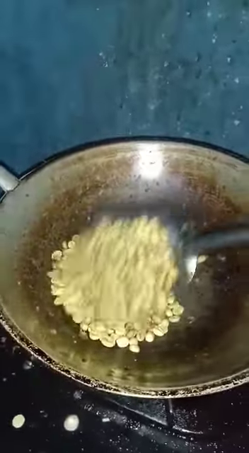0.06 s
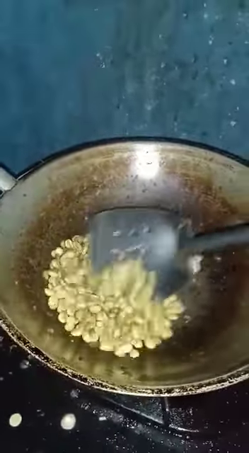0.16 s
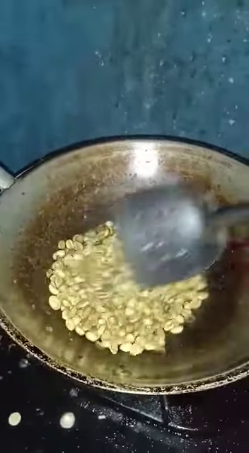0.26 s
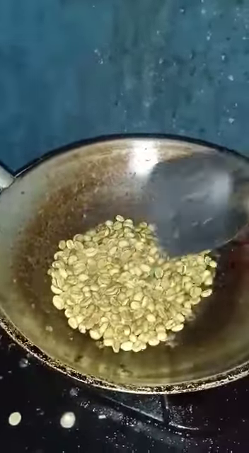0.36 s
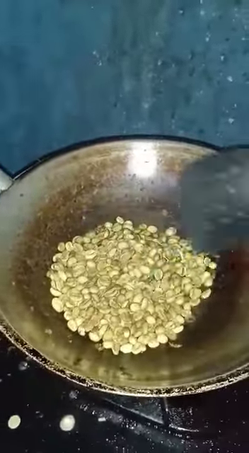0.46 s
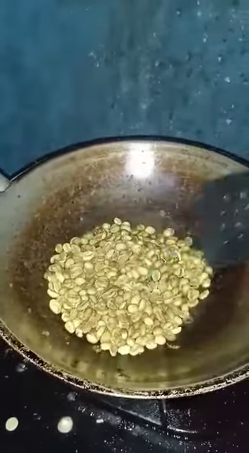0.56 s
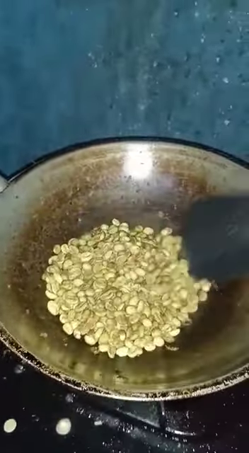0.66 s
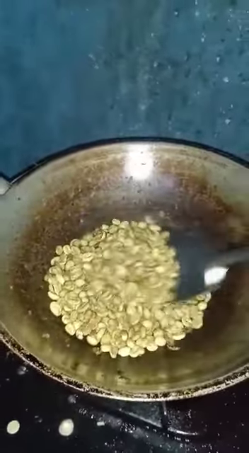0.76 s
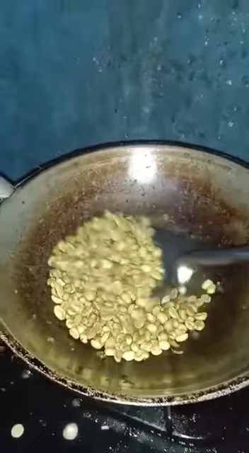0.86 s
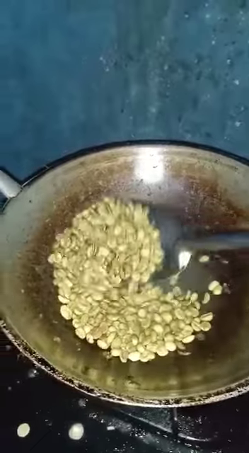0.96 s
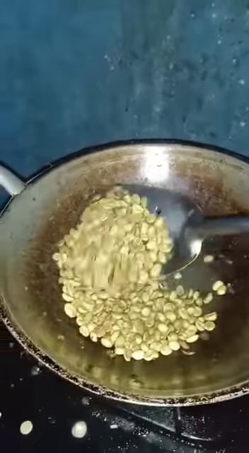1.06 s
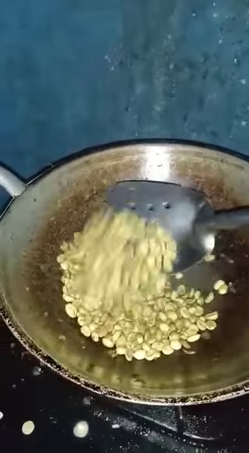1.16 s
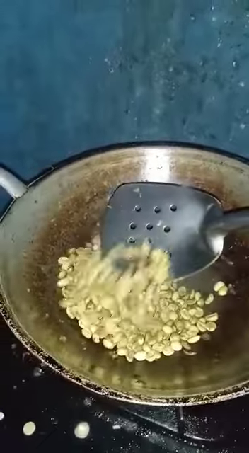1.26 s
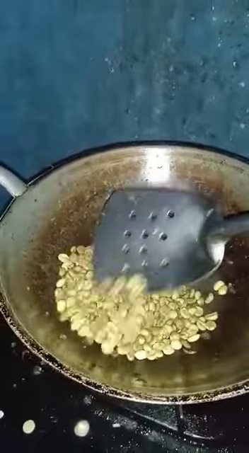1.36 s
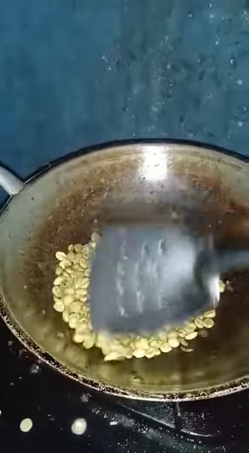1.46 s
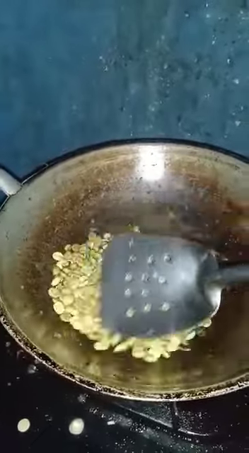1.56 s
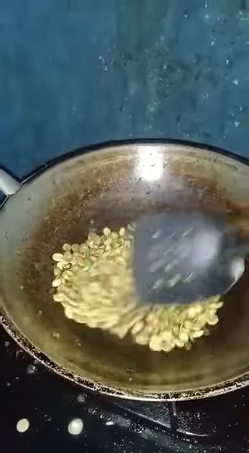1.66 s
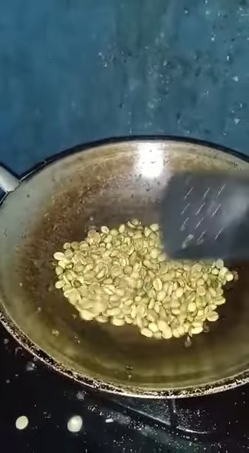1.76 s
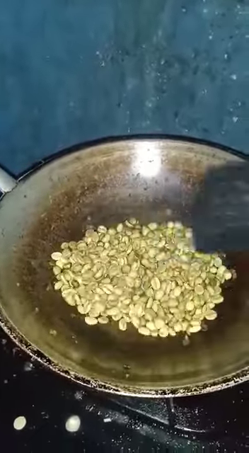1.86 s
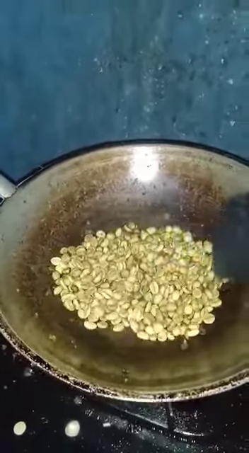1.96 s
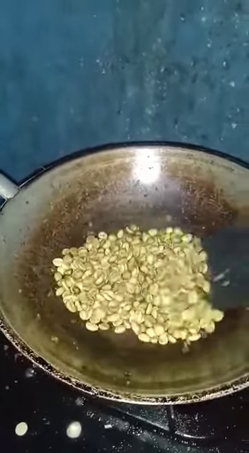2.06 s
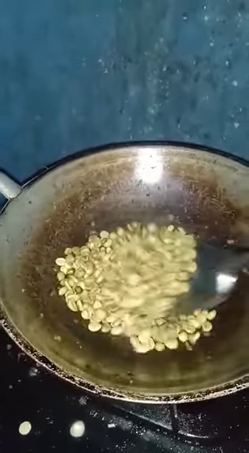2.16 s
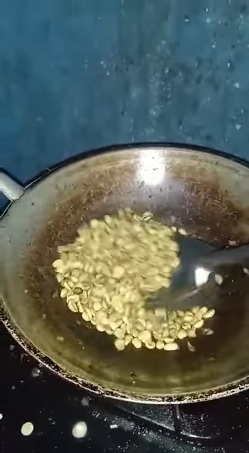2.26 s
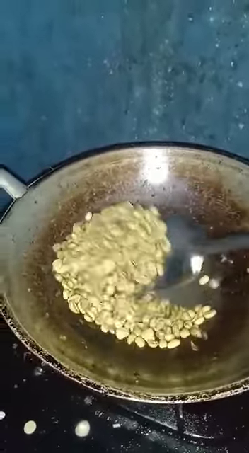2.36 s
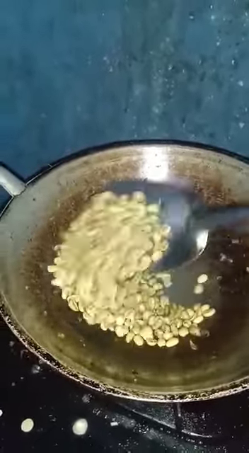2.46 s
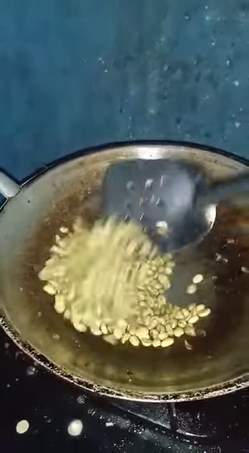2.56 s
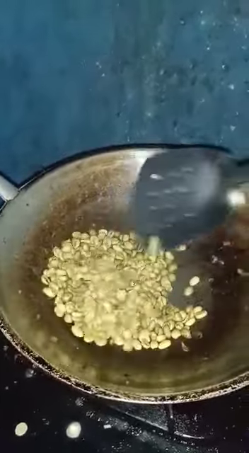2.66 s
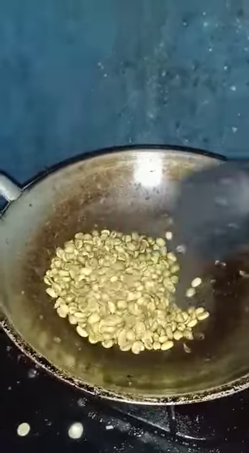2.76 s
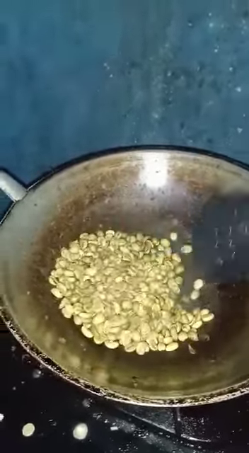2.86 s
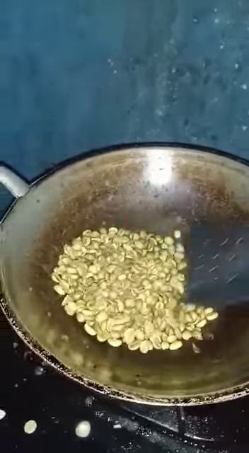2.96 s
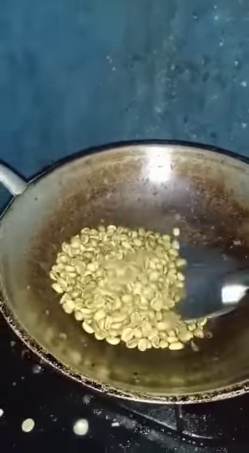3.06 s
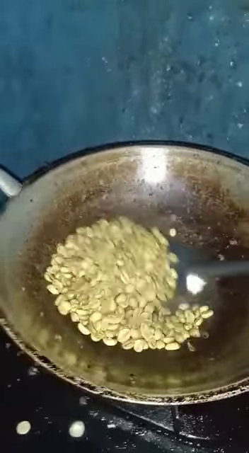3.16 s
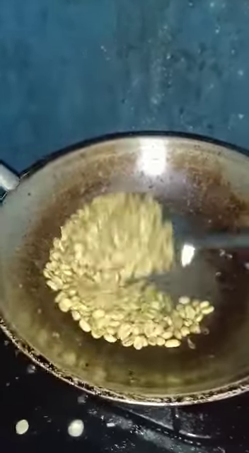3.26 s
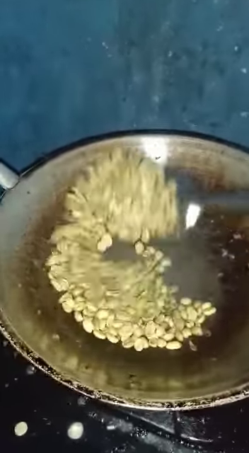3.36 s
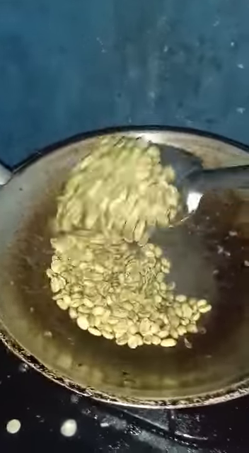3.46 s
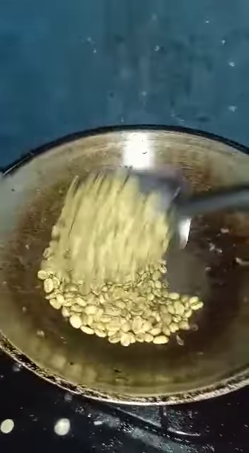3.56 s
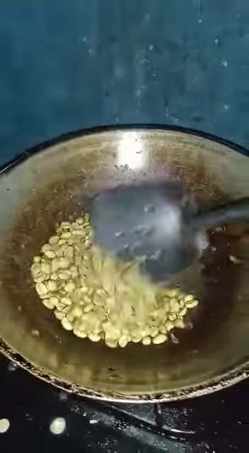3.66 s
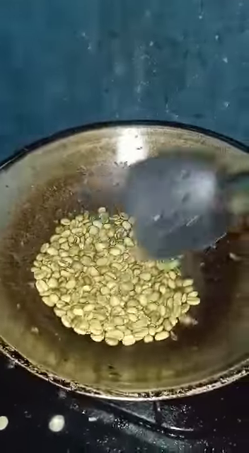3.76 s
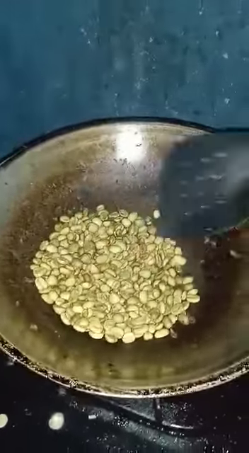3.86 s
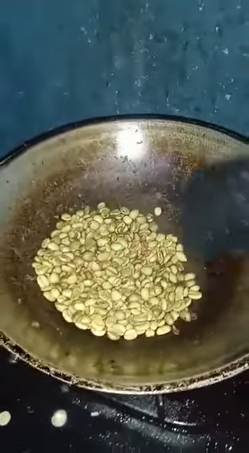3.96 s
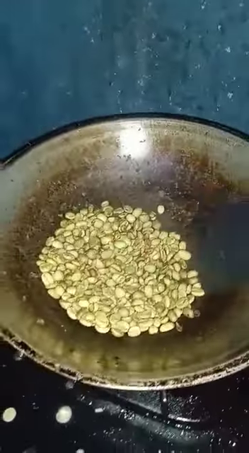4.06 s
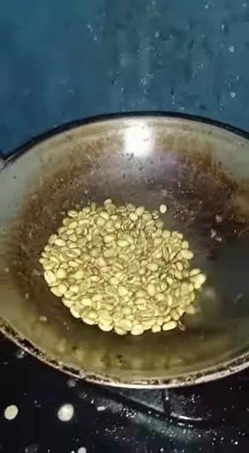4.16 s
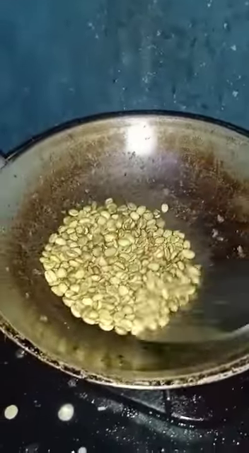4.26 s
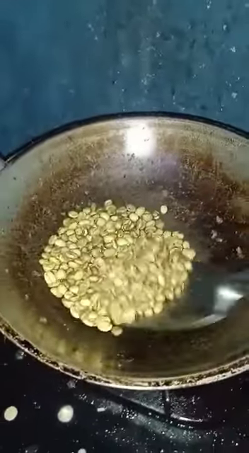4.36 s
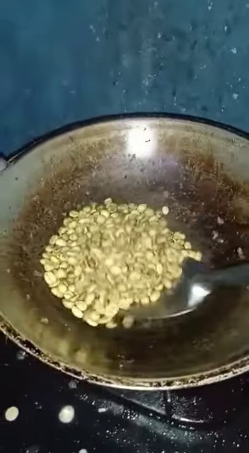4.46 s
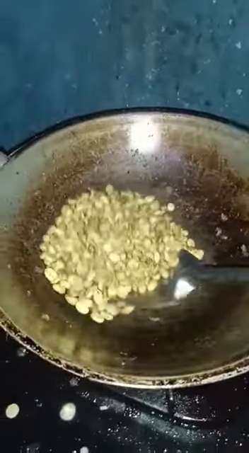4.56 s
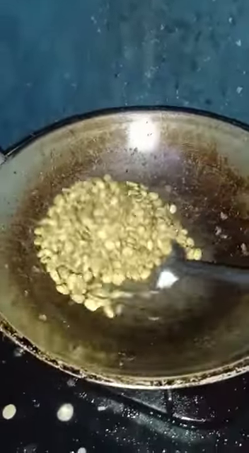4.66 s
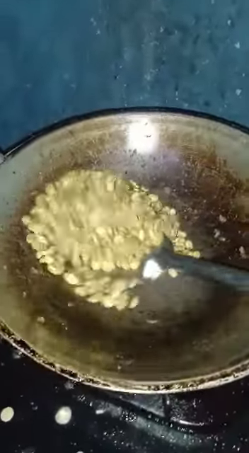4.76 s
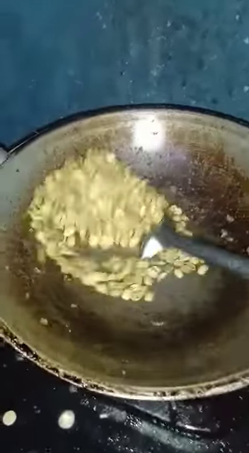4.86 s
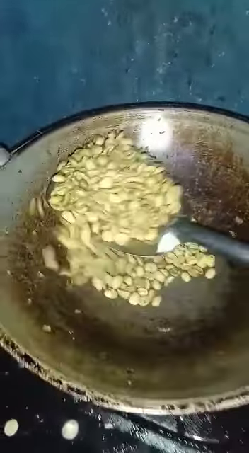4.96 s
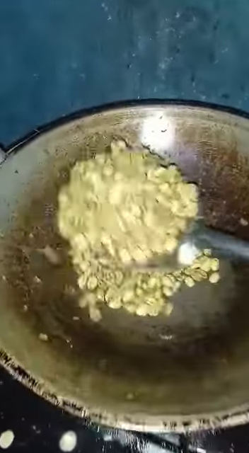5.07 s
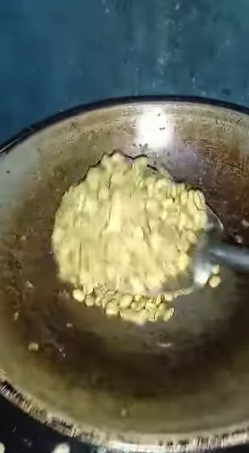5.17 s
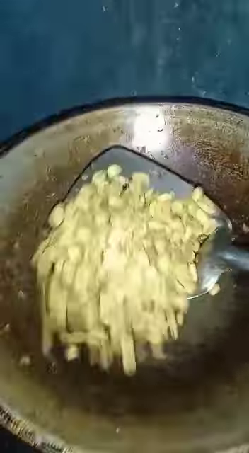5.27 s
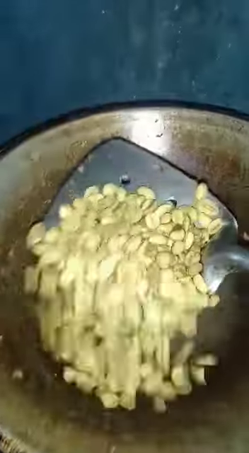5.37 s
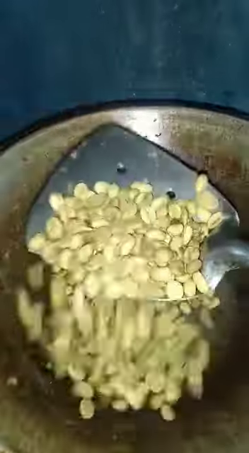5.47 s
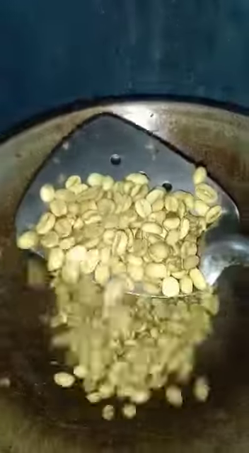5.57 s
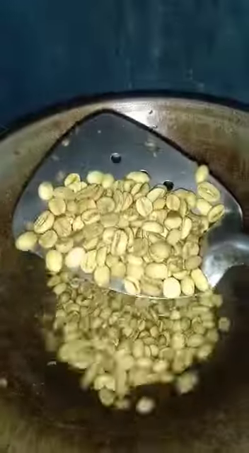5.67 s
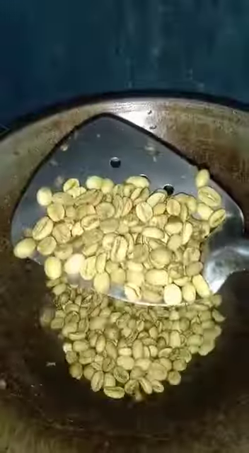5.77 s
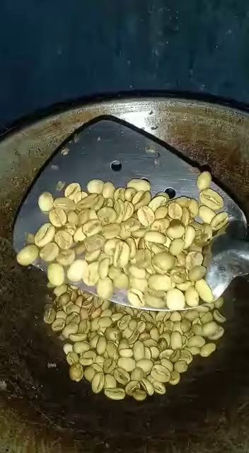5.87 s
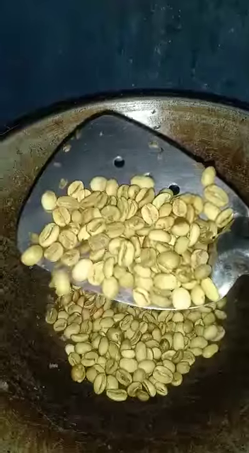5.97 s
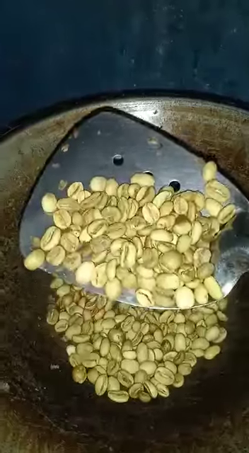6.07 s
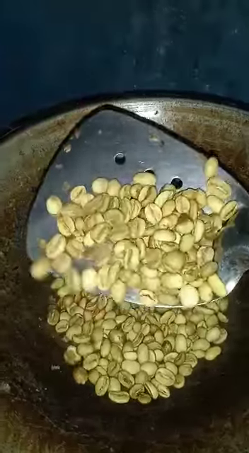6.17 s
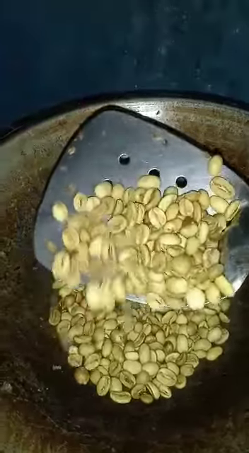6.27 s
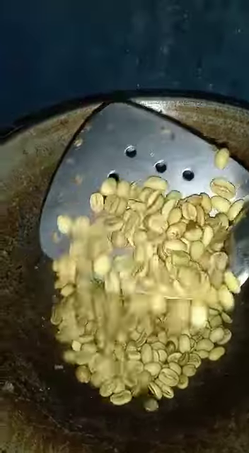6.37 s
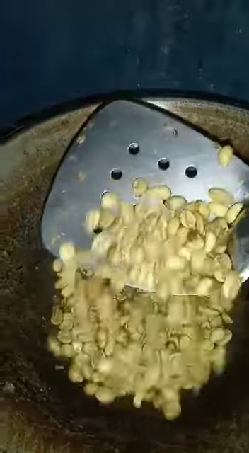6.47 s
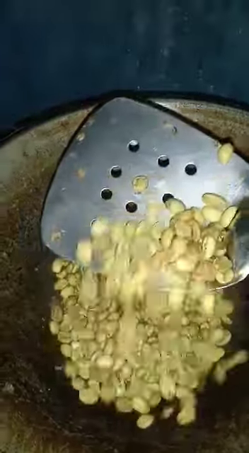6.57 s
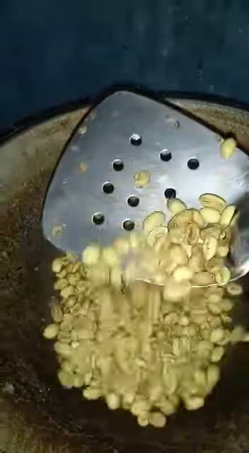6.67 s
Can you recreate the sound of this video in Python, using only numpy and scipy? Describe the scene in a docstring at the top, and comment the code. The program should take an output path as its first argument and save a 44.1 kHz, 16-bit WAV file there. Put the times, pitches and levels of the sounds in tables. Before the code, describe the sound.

A metal spatula scoops and pours dry beans in a steel wok, rattling and scraping, with a few ringing knocks over a faint flame hiss.

```python
"""Close to a phone in a small kitchen, a steel spatula scoops and pours dry beans in a wok.
Throughout, filtered noise is the soft flame hiss, a sine the high whine, ringing boards the dull footfalls.
A thin squeal glides past early on, among short slides of dense random clicks, scrapes and light knocks.
Harder blows then ring the wok's decaying modes; bowed tones and rough groans come and go under the blade.
Towards the end beans land hard and pour loudest, as filtered bursts and crackles in a short room tail."""
import sys
import numpy as np
from scipy import signal
from scipy.fft import rfft, irfft
from scipy.io import wavfile
from scipy.ndimage import uniform_filter1d

SR = 44100
rng = np.random.default_rng(int(sys.argv[2]) if len(sys.argv) > 2 else 0)


def digitize_waveform(pressure):
    """Quantize a signal to 16-bit integers and store it at the path in sys.argv[1].

    Rows of a 2-D input are taken as channels; values are limited to [-1, 1].
    """
    field = np.atleast_2d(pressure).T
    bounded = np.clip(field, -1, 1)
    quanta = np.round(bounded * 32767).astype(np.int16)
    wavfile.write(sys.argv[1], SR, quanta)


N = 295911
TIME = np.arange(N) / SR

# ringing modes of the wok, before damping: f/Hz, level/dB, t60/s
WOK_MODES = [(315, -6, .2), (343, -2, .25), (366, -4, .2), (483, 0, .3), (861, -6, .2), (1200, -12, .22),
             (1739, -7, .24), (1971, -2, .3), (1992, -4, .25), (2103, 0, .3), (2300, -9, .2),
             (2435, -5, .26), (2564, -6, .3), (2885, -5, .15), (3177, -4, .2), (3391, -12, .25),
             (3973, -12, .25), (4479, -11, .22), (4732, -8, .16), (5082, -7, .12), (5491, -11, .18),
             (6169, -6, .15), (6385, -9, .2), (7671, -10, .1)]
# spectrum of bean clicks: f/Hz, level/dB
BEAN_SPECTRUM = [(2000, -83.5), (3400, -21.5), (4170, -13), (4540, -3), (4770, 4), (5630, 7.5), (6770, 6),
                 (9000, -37), (11700, -79.5), (19800, -120)]
# spectrum of the sharp edge of the clicks: f/Hz, level/dB
EDGE_SPECTRUM = [(5000, -25.5), (8500, -4), (13500, -16.5), (15400, -4), (16200, -19), (16400, -13.5),
                 (16500, -72)]


def undb(db):
    """Amplitude factor of a level in dB."""
    return 10 ** (np.asarray(db) / 20)


def unit(x):
    """Scale to an RMS of 1."""
    return x / np.sqrt(np.mean(x ** 2))


def colour(x, table):
    """Causal minimum-phase filter with the gain of a (f/Hz, level/dB) table."""
    hz, db = np.transpose(table)
    grid = np.maximum(np.fft.rfftfreq(2048, 1 / SR), 1)
    gain_db = np.interp(np.log(grid), np.log(hz), db)
    # fold the cepstrum onto positive time
    cepstrum = irfft(np.log(undb(gain_db)))
    cepstrum[1:1024] *= 2
    cepstrum[1025:] = 0
    response = irfft(np.exp(rfft(cepstrum)))
    return signal.fftconvolve(x, response)[:len(x)]


def band(x, hz, width):
    """Steep resonance: a band-pass applied twice."""
    b, a = signal.iirpeak(hz, hz / width, SR)
    return signal.lfilter(b, a, signal.lfilter(b, a, x))


def ring(x, hz, t60):
    """One decaying mode; a unit impulse gives a sine that starts to decay from 1."""
    pole = np.exp(2j * np.pi * hz / SR - np.log(1000) / (t60 * SR))
    return signal.lfilter([1], [1, -pole], x).imag


def glide(hz):
    """Sine of RMS 1 that follows a frequency in Hz, sample by sample."""
    return np.sqrt(2) * np.sin(2 * np.pi * np.cumsum(hz) / SR)


def walk(rate):
    """Random levels held 1 / rate s and slewed twice; RMS 1."""
    k = int(SR / rate)
    held = np.repeat(rng.standard_normal(N // k + 1), k)
    return unit(uniform_filter1d(uniform_filter1d(held, k), k)[:N])


def drive(force, modes, wander_db, damp=0.52):
    """A steady force rings each mode near its table level; the contact wanders, so the modes take turns."""
    out = 0
    for hz, db, t60 in modes:
        push = force * undb(db + wander_db * walk(5.6))
        out = out + ring(push, hz, damp * t60) / np.sqrt(t60 * SR / 24)
    return out


def clicks(rate, spread_db, clump_db, clump_rate, t60):
    """Random impacts in clumps, a few much harder than the rest; each is a short dying crackle."""
    chance = rng.random((2, N))
    size = undb(-spread_db * np.log(chance[1] + 0.04) + clump_db * walk(clump_rate))
    impacts = (chance[0] < rate / SR) * size ** 2
    fade = np.exp(-2 * np.log(1000) / (t60 * SR))
    power = signal.lfilter([1], [1, -fade], impacts)
    return unit(np.sqrt(power) * rng.standard_normal(N))


def burst(length_s, t60):
    """Noise that dies away, peak near 1."""
    t = np.arange(int(length_s * SR)) / SR
    return rng.standard_normal(len(t)) * undb(-60 * t / t60) / 2


def add(out, s, x):
    """Mix x into out from s seconds on."""
    i = int(s * SR)
    out[i:i + len(x)] += x[:max(len(out) - i, 0)]


def swells(s, length_s, first_db, last_db, rise_s, fall_db_s):
    """Level in dB of overlapping gestures: quick rise, straight ramp, steady fall."""
    power = 1e-16
    for t, n, a, b in zip(s, length_s, first_db, last_db):
        end = t + max(n, rise_s)
        corners_s = [t, t + rise_s, end, end + 80 / fall_db_s]
        level_db = np.interp(TIME, corners_s, [a - 30, a, b, b - 80], -200, -200)
        power = power + undb(2 * level_db)
    return 10 * np.log10(power)


def flame():
    """Filtered noise: a soft hiss that flutters a little."""
    # spectrum of the burning gas: f/Hz, level/dB
    flame_spectrum = [(18, -53.5), (30, -20.5), (192, 0.5), (270, -5), (369, 1), (622, -19.5),
                      (1140, -16.5), (1360, -3.5), (1640, -15), (2550, -11.5), (3490, -16), (6370, -19.5),
                      (8280, -27), (12900, -42), (15500, -13.5)]
    hiss = unit(colour(rng.standard_normal(N), flame_spectrum))
    return undb(-68 + 1.9 * walk(6.)) * hiss


def whine():
    """A steady high sine whose level wavers around a slow curve."""
    # mean level of the whine: t/s, level/dB
    whine_curve = [(0.0, -87), (1.9, -85), (5.3, -76.5), (5.8, -81), (6.71, -77)]
    s, db = np.transpose(whine_curve)
    level_db = np.interp(TIME, s, db) + walk(5.9)
    return undb(level_db) * np.sqrt(2) * np.sin(2 * np.pi * 15626 * TIME)


def squeal():
    """One thin sine that glides up and back."""
    # path of the squeal: t/s, f/Hz, level/dB
    squeal_path = [(0.3, 11800, -102), (0.382, 13087, -91), (0.472, 14030, -94), (0.5, 14240, -102),
                   (0.506, 12998, -93), (0.53, 12170, -97)]
    s, hz, db = np.transpose(squeal_path)
    level_db = np.interp(TIME, s, db, -140, -140)
    return undb(level_db) * glide(np.interp(TIME, s, hz))


def steps():
    """Heel and sole: two dull thumps that shake the floor boards into decaying modes."""
    # footfalls: t/s, heel peak level/dB
    step_times = [(0.076, -52), (0.272, -44), (0.612, -41), (0.913, -49.5), (1.304, -48), (1.688, -46),
                  (2.02, -47), (2.303, -47.5), (2.736, -44), (3.101, -45.5), (3.452, -51), (3.757, -45.5),
                  (4.132, -61), (4.491, -49), (4.819, -48), (5.179, -47.5), (5.559, -49.5), (5.75, -48.5),
                  (5.929, -49), (6.3, -50), (6.671, -49)]
    # boards under the feet: f/Hz, level/dB (before a weight by f), t60/s
    floor_modes = [(95, -7, 0.17), (130, 2.5, 0.081), (216, 5, 0.091), (313, 12, 0.038), (341, -6.5, 0.14)]
    sole_delay_s, sole_db = 0.0159, -4
    out = np.zeros(N)
    for s, db in step_times:
        for delay_s, part_db in ((0, 0), (sole_delay_s, sole_db)):
            push = uniform_filter1d(burst(.2, 0.031), size=30)  # softened contact
            thump = sum(undb(g) * ring(push, hz, t60) * hz for hz, g, t60 in floor_modes)
            add(out, s + delay_s, undb(db + part_db) * thump / np.abs(thump).max())
    return out


def groans():
    """The blade groans as it slides under the heap: a rough gliding tone that swells and fades."""
    # groans: start t/s, end t/s, start f/Hz, end f/Hz, RMS level before the swell/dB
    groan_table = [(0.602, 0.767, 496.5, 700, -60), (2.023, 2.186, 520, 652, -63),
                   (2.88, 3.106, 530, 619, -59), (4.257, 4.463, 552, 519, -65)]
    out = np.zeros(N)
    for start, end, from_hz, to_hz, db in groan_table:
        u = np.linspace(0, 1, int((end - start) * SR))
        rough = uniform_filter1d(rng.standard_normal((2, len(u))), size=500)
        phase = 2 * np.pi * np.cumsum(from_hz + (to_hz - from_hz) * u) / SR
        tone = (rough[0] + 1j * rough[1]) * np.exp(1j * phase)
        add(out, start, undb(db) * unit(tone.real) * np.sin(np.pi * u))
    return out


def bows():
    """The dragging blade bows one wok mode: a slightly unsteady tone, quick to start, then ringing out."""
    # catches of the blade: start t/s, length/s, mean f/Hz, level before flutter/dB
    bow_table = [(0.123, 0.046, 2280, -60), (0.15, 0.13, 481.7, -64), (0.511, 0.085, 484, -60.5),
                 (0.648, 0.023, 494, -54), (0.653, 0.083, 2877, -60), (1.973, .07, 1966, -61),
                 (2.503, 0.11, 2310, -64), (2.861, 0.11, 488, -62), (2.851, 0.058, 870, -60.5),
                 (3.007, 0.051, 3190, -49.5), (3.403, 0.14, 1952, -57.5), (3.527, 0.24, 482, -66.5),
                 (3.625, 0.065, 2290, -60.5), (4.61, .09, 2280, -70.5), (4.878, 0.24, 2915, -59.5),
                 (4.906, 0.19, 2087, -59.5), (4.947, 0.21, 483, -68.5)]
    rise_s, fall_db_s = .015, 300.
    flutter_db, jitter = 3., .006  # jitter as a share of the pitch
    out = 0
    for s, length_s, hz, db in bow_table:
        level_db = swells([s], [length_s], [db], [db], rise_s, fall_db_s) + flutter_db * walk(40.)
        out = out + undb(level_db) * glide(hz * (1 + jitter * walk(60.)))
    return out


def scrape(grit_db):
    """The blade stutters over steel; the slips grate, and the drag bows the low and the middle wok modes."""
    grit_hz = 3186 * (1 + 0.12 * walk(2.78))  # the centre of the grit drifts
    slips = clicks(rate=1100.0, spread_db=4.0, clump_db=3.5, clump_rate=30., t60=0.012)
    # beans skidding on bare steel
    grit = undb(6.5 + 2 * walk(11.0)) * unit(band(slips, 4203.0, 660.0))
    # fixed bands fade in and out as the drifting centre passes them
    for hz in np.geomspace(2200, 3600, num=6):
        nearness = np.exp(-.5 * (np.log2(grit_hz / hz) / .25) ** 2)
        grit = grit + nearness * unit(band(slips, hz, 450.))
    # the wok rings under any slide
    bow = rng.standard_normal(N)
    hum_db, sing_db = grit_db - 17, grit_db - 20
    hum = drive(bow * undb(hum_db), WOK_MODES[3:4], wander_db=0.7, damp=0.93)
    hum = hum + drive(bow * undb(hum_db - 3), WOK_MODES[:3], wander_db=5.0)
    sing = drive(bow * undb(sing_db), [WOK_MODES[7], WOK_MODES[9]], wander_db=1.5, damp=0.4)
    upper = drive(bow * undb(grit_db - 9), WOK_MODES[10:], wander_db=4.0, damp=.5)
    return undb(grit_db + 1.5) * grit + hum + sing + upper


def knocks():
    """Each blade blow rings the wok modes with its own weights, over a clash of unresolved ones."""
    # blows: t/s, level/dB, bass share/dB, treble share/dB (shares before limits),
    # damping by the beans/0-1, level of the ringing modes/dB
    knock_table = [(0.524, -58, 10, 17, 0.1, -11), (0.609, -45, -9, 22, 0.2, -15),
                   (1.532, -36, 6, 11, 0.91, -11), (1.981, -39, 0, 23, 0.15, -15),
                   (2.86, -39.5, -0.5, 10, 0.7, -15.5), (3.645, -30.5, -4.5, -1, 0.9, -26),
                   (3.898, -55.5, -12, 2, 0, -26), (4.118, -22.5, -2, -1.5, 0.41, -9),
                   (4.704, -37, 10, -16, 1, -7)]
    tilt_hz = [500, 800, 1000, 1700, 3200, 4500]
    out = np.zeros(N)
    for s, db, bass_db, treble_db, damp, ring_db in knock_table:
        bass_db, treble_db = np.clip([bass_db, treble_db], -14, 10)
        blow = np.diff(burst(.6, 0.023))  # a shell radiates the change of force, so little below its modes
        weight_db = 1.5 * rng.standard_normal(len(WOK_MODES))
        low_db = bass_db - 14 * damp ** 3  # a heap of beans stills the lowest modes most
        ringing = 0
        for (hz, mode_db, t60), w in zip(WOK_MODES, weight_db):
            tilt_db = np.interp(np.log(hz), np.log(tilt_hz), [low_db, bass_db, bass_db, 0, 0, treble_db])
            mode = ring(blow, hz, t60 * np.clip(1.3 - damp, .1, 1.2))
            ringing = ringing + undb(mode_db + w + tilt_db) * mode / np.abs(mode).max()
        body = [(60, low_db - 29), (280, low_db - 19), (900, bass_db), (1500, -6), (3200, 1),
                (6300, treble_db + 1.0), (8500, treble_db - 15), (13000, treble_db - 25),
                (16000, treble_db - 9.5)]
        clash = colour(burst(.6, 0.36 - 0.23 * damp), body)[1:]
        add(out, s, undb(db) * (undb(ring_db) * ringing + undb(5.5) * clash))
    return out


def drops():
    """A single bean landing hard: click, short chatter, hollow knock, from one dying burst of noise."""
    # landings: t/s, click peak level/dB
    drop_table = [(0.0823, -34), (0.1078, -36), (0.5264, -37), (0.609, -45), (0.9387, -34), (1.4017, -30),
                  (1.508, -39), (1.9884, -28), (2.0417, -37), (2.0875, -33), (2.2746, -31), (2.4714, -44),
                  (2.8609, -30.5), (3.327, -34), (3.5528, -22), (3.9012, -41), (4.117, -25.5),
                  (4.2554, -37), (4.5587, -39), (4.6002, -40), (4.9242, -26), (5.1043, -19), (5.2115, -30),
                  (5.2787, -18.5), (5.298, -36), (5.3493, -14.5), (5.5117, -22.5), (5.693, -20.5),
                  (5.7253, -25), (6.1026, -29), (6.294, -48.5), (6.3102, -25), (6.3595, -25), (6.3924, -32),
                  (6.4196, -24.5), (6.4545, -17.5), (6.5139, -17.5), (6.5794, -21)]
    click_rise_s = .002  # from first touch to the peak of a click
    out = np.zeros(N)
    for s, db in drop_table:
        knock_db = -29.5 + 2.5 * rng.standard_normal()
        hit = burst(.06, 0.047)
        click = colour(hit, BEAN_SPECTRUM) + undb(-10.5) * colour(hit, EDGE_SPECTRUM)
        touch = hit * undb(-60 * np.arange(len(hit)) / SR / 0.0015)
        knock = ring(touch, 893.0, 0.035)
        landing = click / np.abs(click).max() + undb(knock_db) * knock / np.abs(knock).max()
        add(out, s - click_rise_s, undb(db) * landing)
    return out


def beans(rattle_db, heap_db):
    """Dense clicks of three crowds of beans, a little apart in pitch; they drum the bowl's air, wok and blade."""
    # air in the bowl: f/Hz, width/Hz, mean level/dB
    bowl_air = [(605, 350, -9.5), (640, 160, -12.5), (889, 340, 8), (1070, 600, -4.5)]
    # modes of the thin spatula, before damping: f/Hz, level/dB, t60/s
    blade_modes = [(8490, 0, .5), (9141, -2, .5), (10800, -5, .4), (11550, -3, .4)]
    # the louder the rattle, the larger the share of sharp edge; -19.5 dB at a rattle of -40 dB
    edge_db = -19.5 + .25 * np.maximum(rattle_db + 40, -20)
    clump = undb(1.5 * walk(35.))
    rattle, hits = 0, 0
    for shift in (.95, 1., 1.05):
        crowd = clump * clicks(rate=350., spread_db=4.0, clump_db=2.0, clump_rate=80., t60=0.014)
        spectrum = [(shift * hz, db) for hz, db in BEAN_SPECTRUM]
        rattle = rattle + undb(1.5 * walk(9.)) * unit(colour(crowd, spectrum))
        hits = hits + crowd
    bowl = sum(undb(db + 3.3 * walk(5.94)) * band(hits, hz, width) for hz, width, db in bowl_air)
    upper_modes = [m for m in WOK_MODES if m[0] > 2200]
    wok = drive(hits * undb(rattle_db - 40), upper_modes, wander_db=3.)
    blade = drive(hits * undb(rattle_db + edge_db - 26.0), blade_modes, wander_db=0.0)
    edge = undb(edge_db) * unit(colour(hits, EDGE_SPECTRUM))
    return undb(rattle_db) * (unit(rattle) + edge) + undb(heap_db) * unit(bowl) + wok + blade


def room_tail(near):
    """Reverberation of the small kitchen: the near sounds convolved with coloured dying noise."""
    tail = colour(burst(.6, .34), [(100, 5.0), (1000, 1), (6000, -1.0), (10000, -7.5), (16000, -9.5)])
    return undb(-8) * signal.fftconvolve(near, tail / np.sqrt(np.sum(tail ** 2)))[:N]


def scene():
    """Slides of the blade set the levels of beans and scrape; near sounds get a room, the background none."""
    # beans on the move, pushed or poured: start t/s, length/s, rattle level at first/dB and at last/dB,
    # heap share/dB, grit share/dB (both relative to the rattle)
    slides = [(-.03, 0.12, -40, -51, -17.5, -16), (0.078, 0.13, -36.5, -34, -20.5, -17),
              (0.644, 0.17, -39.5, -45.5, -14, -10), (0.825, .1, -50.5, -52.5, -12.5, -12),
              (0.927, 0.32, -46.5, -44, -23.5, -17.5), (1.258, 0.12, -54, -49.5, -18.5, -21.5),
              (1.391, 0.15, -39, -48, -25.5, -25.5), (1.503, 0.033, -33.5, -41.5, -12, -12.5),
              (1.574, .18, -46, -46.5, -23, -14), (2.03, 0.11, -42, -36, -16.5, -9),
              (2.146, .24, -40.5, -44.5, -24, -18.5), (2.397, 0.19, -45, -42, -21.5, -15.5),
              (2.604, 0.18, -48.5, -55, -19.5, -18.5), (2.919, 0.13, -52.5, -37.5, -26.5, -10.5),
              (3.045, 0.14, -42, -47.5, -13.5, -12), (3.168, 0.18, -51, -43.5, -21, -14.5),
              (3.33, .24, -42, -36, -25, -16.5), (3.567, 0.14, -38, -35, -25, -14.5),
              (4.237, 0.21, -47.5, -48, -9.5, -12.5), (4.45, 0.11, -54, -62.5, -10, -15),
              (4.561, .25, -46.5, -50, -13.5, -20.5), (4.809, 0.31, -41.5, -31.5, -26, -23.5),
              (5.186, 0.084, -43.5, -43, -20, -18.5), (5.276, .3, -27, -26.5, -28.5, -31),
              (5.605, 0.059, -29, -37, -29.5, -27), (5.676, 0.031, -28, -35, -24, -21),
              (6.288, 0.17, -50, -47, -18.5, -17.5), (6.44, 0.36, -31.5, -37, -27.5, -28.5)]
    s, length_s, first_db, last_db, heap_share_db, grit_share_db = np.transpose(slides)

    def slide_level(share_db):
        """Level curve in dB of one share of all slides."""
        return swells(s, length_s, first_db + share_db, last_db + share_db, rise_s=0.021, fall_db_s=356.5)

    background = flame() + whine() + squeal()
    blade = groans() + bows() + scrape(slide_level(grit_share_db)) + knocks()
    near = steps() + blade + drops() + beans(slide_level(0), slide_level(heap_share_db))
    return (near + room_tail(near) + background)[None]


def record(dry):
    """The phone's microphone thins the bass below 85 Hz and cuts the top above 15850 Hz."""
    thin = signal.sosfilt(signal.butter(3, 85., "high", fs=SR, output="sos"), dry)
    return signal.sosfilt(signal.ellip(8, .2, 60, 15850, fs=SR, output="sos"), thin)


dry = scene()
out = record(dry)
digitize_waveform(out)
```